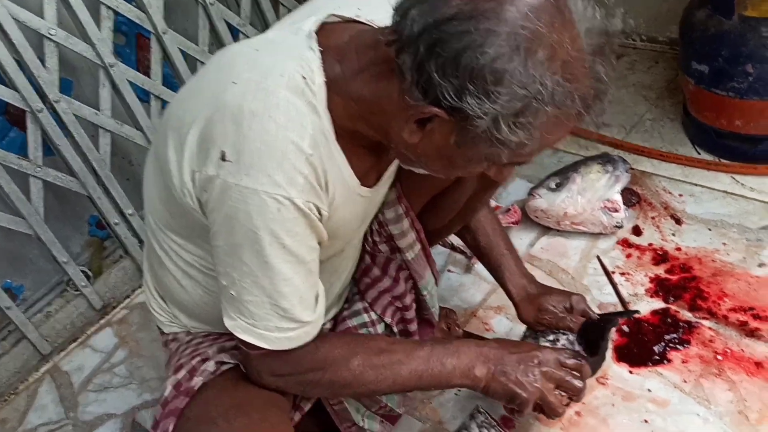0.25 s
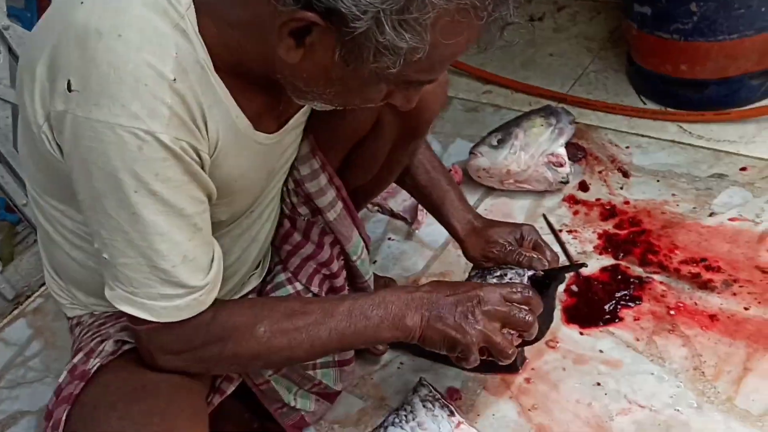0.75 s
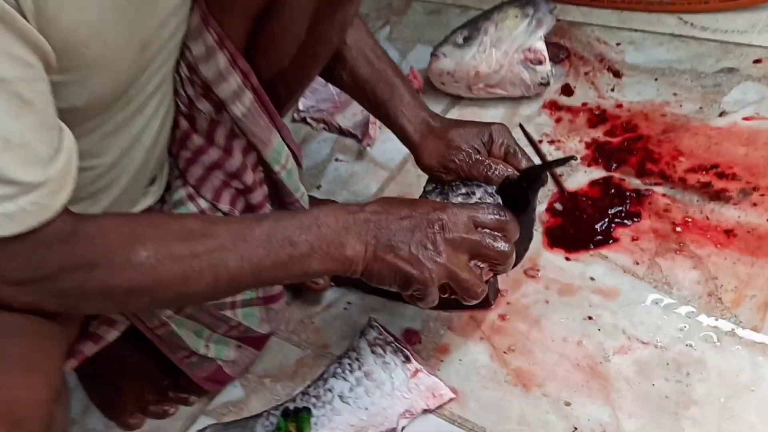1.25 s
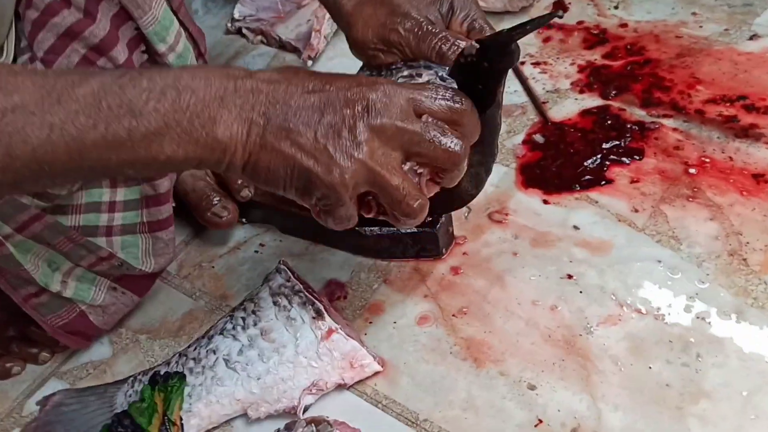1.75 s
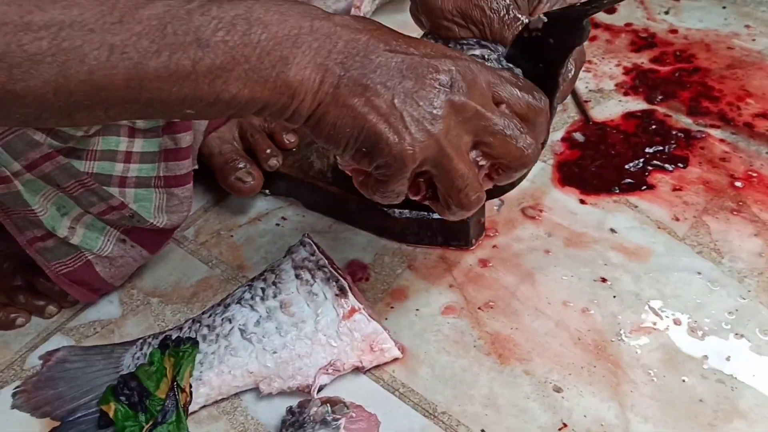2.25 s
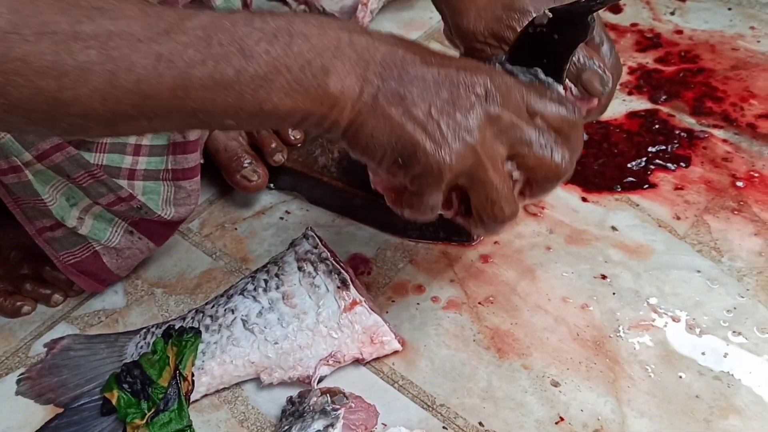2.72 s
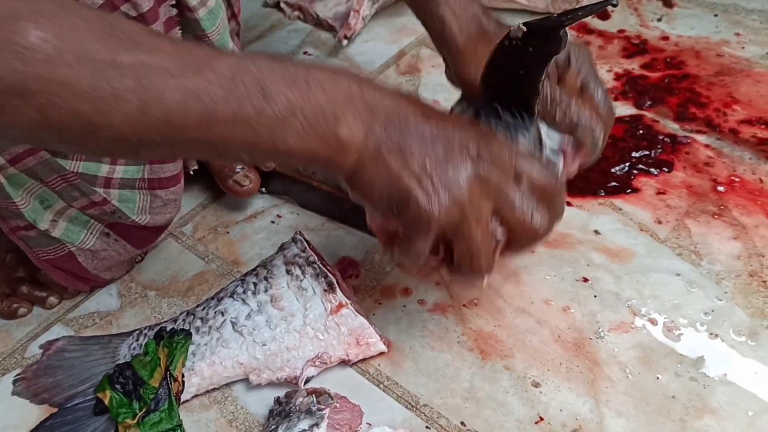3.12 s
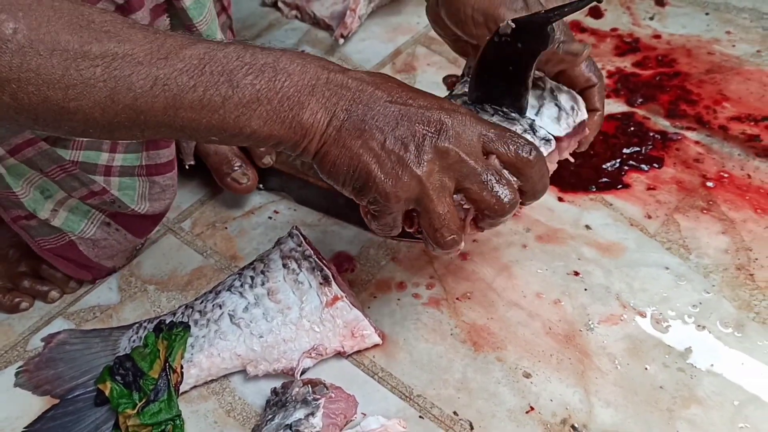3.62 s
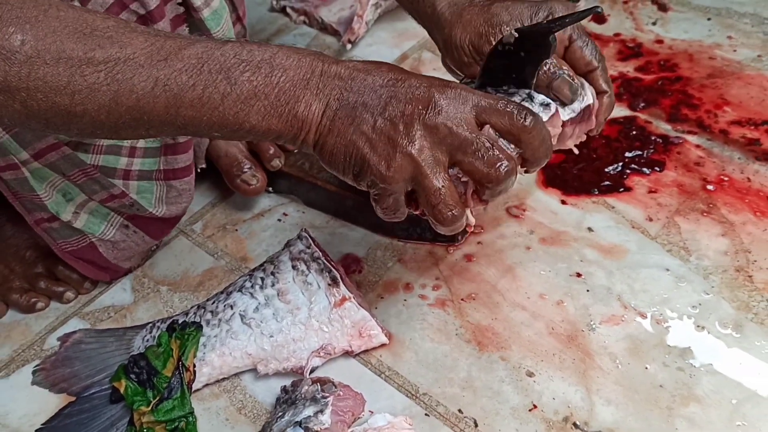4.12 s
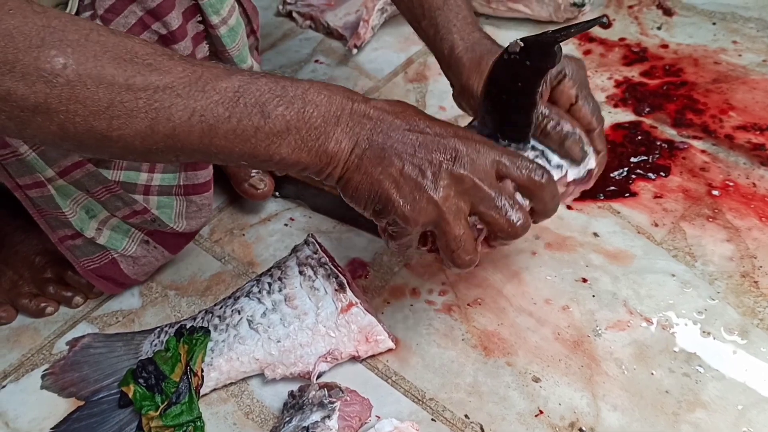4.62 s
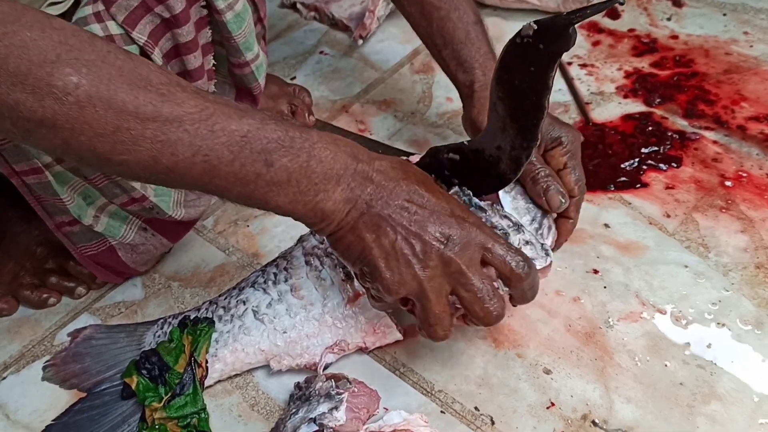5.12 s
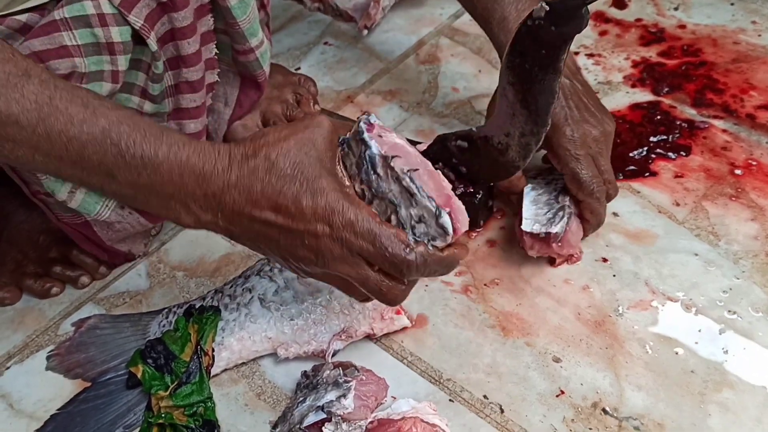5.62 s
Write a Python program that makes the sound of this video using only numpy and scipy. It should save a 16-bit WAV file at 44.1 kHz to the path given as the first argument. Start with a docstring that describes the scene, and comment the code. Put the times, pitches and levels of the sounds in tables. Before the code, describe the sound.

A large scaly fish is shoved through a fixed upright blade in crunching, snapping bursts over steady hiss in a small hard room.

```python
"""A large scaly fish is pushed in short shoves through an upright fixed blade, on a tiled floor.
Throughout: noise hiss and a growing low rumble in a small hard room, heard by two spaced microphones.
From 0.9 s: light scrapes, as random crackle. Near 2.4, 2.8, 4.4 and 4.9 s: hard shoves; scales crunch,
bones snap (noise bursts, damped rings), wet skin squeaks (gliding notes), the base knocks (damped modes).
From 5.1 s: ticks, a faint snap, low bumps (sagging sines) and a muffled rustle (filtered crackle)."""
import sys
import numpy as np
from scipy import signal
from scipy.fft import rfft, irfft
from scipy.io import wavfile
from scipy.ndimage import uniform_filter1d

SR = 44100
rng = np.random.default_rng(int(sys.argv[2]) if len(sys.argv) > 2 else 0)


def transcribe(u):
    """Save the signal u as a 16-bit wav file named by the first command-line argument.

    u: samples, shape (n,) or (channels, n), limited to [-1, 1]; the rate is SR.
    q: integer samples, one column per channel.
    """
    v = np.clip(np.atleast_2d(u).T, -1, 1)
    q = np.round(v * 32767).astype(np.int16)
    wavfile.write(sys.argv[1], SR, q)


N = 258426


def amp(db):
    """Decibels to gain."""
    return 10 ** (np.asarray(db) / 20)


def evened(x):
    """Scales to an rms of 1."""
    return x / np.sqrt(np.mean(x ** 2) + 1e-20)


def read(points, hz):
    """A table joined by straight lines over log frequency."""
    f, value = np.transpose(points)
    return np.interp(np.log(hz + 1), np.log(f + 1), value)


def curve(points):
    """A table joined by straight lines over time."""
    return np.interp(np.arange(N) / SR, *np.transpose(points))


def add(mix, s, sound):
    """Mixes a sound in at s seconds."""
    part = mix[..., max(round(s * SR), 0):][..., :sound.shape[-1]]
    part += sound[..., :part.shape[-1]]


def panned(x, side_table):
    """Splits a left-right level difference by pitch over a stereo spectrum."""
    hz = np.fft.rfftfreq(N, 1 / SR)
    return x * amp(np.outer([.5, -.5], read(side_table, hz)))


def colour(x, spectrum, size=2048):
    """Causal minimum-phase filter of unit energy: a click rings after it lands, never before."""
    hz = abs(np.fft.fftfreq(size, 1 / SR))
    log_gain = np.log(amp(read(spectrum, hz)))
    taps = np.fft.ifft(np.exp(np.conj(signal.hilbert(log_gain)))).real
    return signal.oaconvolve(x, taps[None] / np.linalg.norm(taps), axes=1)[:, :N]


def resonate(x, hz, width_hz):
    """A damped resonance of peak gain 1: shift down, smooth, shift back up."""
    turn = np.exp(2j * np.pi * np.cumsum(hz * np.ones(x.shape[-1])) / SR)
    r = np.exp(-np.pi * width_hz / SR)
    return 2 * (turn * signal.lfilter([1 - r], [1, -r], x / turn + 1e-18)).real


def uneven(t, spread_db, step_s):
    """A gain that wanders between random levels, a new one every step_s."""
    levels = rng.standard_normal(size=200)
    return evened(amp(spread_db * np.interp(t / step_s, np.arange(len(levels)), levels)))


def crackle(count, share, per_s=4500, spread_db=3):
    """Tiny fractures at random moments; a share of their power reaches both microphones alike."""
    size = amp(spread_db * np.minimum(rng.exponential(1, (3, count)), 4))
    sign = rng.choice([-1, 1], size.shape)
    both, left, right = evened(size * sign * (rng.random(size.shape) < per_s / SR))
    share = np.clip(share, 0, 1)
    return np.sqrt(share) * both + np.sqrt(1 - share) * np.array([left, right])


# hiss, left minus right: f/Hz, level/dB
HISS_SIDE = [(100, -0.5), (500, 1), (1400, -1), (2800, -1.3), (4000, 0), (5500, 0), (6700, 3), (8300, 1.5),
             (12000, -2), (16000, -1)]
MIC_SPACING_M = 0.18


def diffuse(spectrum):
    """Noise from all sides: the two microphones agree only at long wavelengths."""
    hz = np.fft.rfftfreq(N, 1 / SR)
    a, b = rfft(rng.standard_normal((2, N)))
    same = np.sinc(2 * hz * MIC_SPACING_M / 343) * .93  # 343 m/s: speed of sound
    pair = np.array([a, same * a + np.sqrt(1 - same ** 2) * b])
    return evened(irfft(panned(pair, HISS_SIDE) * amp(read(spectrum, hz)), N))


# spectra: f/Hz, level/dB
HISS = [(25, -23), (48, -22), (70, -4.5), (130, 2.5), (400, 5), (780, 3), (1100, 1.5), (1800, 2), (2500, 0),
        (3800, 1.5), (5400, 2), (7500, -3), (8450, -2.5), (9300, -52), (11000, -38), (11650, -9),
        (15500, -11)]
RUMBLE = [(25, -41), (48, -18), (72, -3.5), (92, -8.5), (138, 3.5), (200, -13), (350, -19), (800, -75)]
# courses: t/s, level/dB (hiss: before hiss_gain_db)
HISS_DB = [(0.0, -39), (1.5, -38.5), (3.0, -40), (5.86, -41)]
RUMBLE_DB = [(0, -58.5), (1.2, -55), (2.6, -53), (3.9, -51), (4.5, -43.5), (5.86, -45)]


def background(hiss_gain_db=4, waver_db=0.46, patchy_db=2.0, patchy_below_hz=900):
    """Steady hiss and a growing rumble; the level wavers slightly, the low end comes in uneven patches."""
    hiss = diffuse(HISS) * amp(curve(HISS_DB) + hiss_gain_db)
    rumble = diffuse(RUMBLE) * amp(curve(RUMBLE_DB))
    hz, _, z = signal.stft(hiss + rumble, SR, nperseg=2048, noverlap=1536)
    patches = uniform_filter1d(rng.standard_normal(z.shape[1:]), size=5, axis=0)
    patches = evened(uniform_filter1d(patches, size=7, axis=1))
    waver = evened(uniform_filter1d(rng.standard_normal(z.shape[2]), size=9))
    lowness = 1 / (1 + (hz[:, None] / patchy_below_hz) ** 2)
    z = z * amp(patchy_db * patches * lowness + waver_db * waver)
    return signal.istft(z, SR, nperseg=2048, noverlap=1536)[1][:, :N]


# decay of the tail: f/Hz, t60/s
ROOM_T60 = [(150, 0.091), (600, 0.22), (3000, 0.24), (8000, 0.24), (16000, 0.29)]


def room(x, tail_db=-7, near_db=-6, near_s=0.0043, count=2000):
    """Close echoes off floor and body, then the short tail of tiled walls."""
    size, step = SR // 2, SR // count
    taps = np.zeros((2, size))
    slots = np.arange(2 * step, size - step, step)
    at = slots + rng.integers(0, step, (2, len(slots)))  # one echo a slot
    np.put_along_axis(taps, at, rng.choice([-1., 1.], at.shape), 1)
    near = taps * rng.choice([-1, 1], taps.shape) * np.exp(-np.arange(size) / SR / near_s)
    hz, t, z = signal.stft(taps, SR, nperseg=256)
    decay = np.exp(-np.log(1000) * t / read(ROOM_T60, hz)[:, None])
    tail = signal.istft(z * decay, SR, nperseg=256)[1][:, :size]
    echoes = amp(tail_db) * tail / np.linalg.norm(tail[0]) + amp(near_db) * near / np.linalg.norm(near[0])
    return signal.fftconvolve(x, echoes, axes=1)[:, :N]


# wet fish drags as it is shifted: t/s, length/s, level/dB, centre f/Hz, width/Hz
RUBS = [(1.643, 0.057, -43, 337, 300), (2.236, 0.047, -48, 517, 400), (2.385, 0.14, -50.5, 280, 250),
        (3.721, 0.15, -49.5, 328, 130), (3.94, 0.065, -42.5, 400, 380), (5.496, 0.083, -42.5, 254, 417),
        (5.513, 0.055, -51, 1500, 350), (5.524, 0.059, -42.5, 340, 120), (5.57, .12, -53, 370, 450)]


def rubs(grains_per_s=900, rub_share=1.0):
    """Wet flesh drags over hand and floor: a muffled, grainy rustle that swells and fades."""
    out = np.zeros((2, N))
    for s, length_s, db, hz, width_hz in RUBS:
        grains = crackle(SR // 3, rub_share, grains_per_s)
        rustle = resonate(resonate(grains, hz, width_hz), hz, width_hz)
        rustle = rustle[:, -round(length_s * SR):]  # skips the build-up
        add(out, s, amp(db) * evened(rustle * signal.windows.tukey(rustle.shape[1], .8)))
    return out


# soft bumps of handled fish: t/s, level/dB, starting f/Hz
BUMPS = [(1.486, -38, 298), (2.247, -33, 375), (2.37, -28.5, 252), (3.16, -40.5, 255), (3.19, -40, 335),
         (4.832, -33, 258), (5.106, -38.5, 145), (5.517, -38, 204)]
BUMP_PERIODS, BUMP_SAG = 7.3, 0.21  # length in starting periods; share by which the pitch falls


def bumps():
    """Settling flesh gives a short low swell of sagging pitch and no click; the lower, the longer."""
    out = np.zeros(N)
    for s, db, hz in BUMPS:
        length_s = BUMP_PERIODS / hz
        t = np.arange(0, length_s, 1 / SR)
        turns = np.cumsum(hz * (1 - BUMP_SAG * t / length_s)) / SR
        swell = np.sin(np.pi * (t / length_s) ** 0.62)
        add(out, s, amp(db) * swell * np.sin(2 * np.pi * turns))
    return out


# the blade's base rocks on the floor: t/s, level/dB, favoured f/Hz
KNOCKS = [(2.376, -23, 597), (2.402, -25, 520), (2.74, -21, 635), (2.776, -17.5, 626), (3.193, -35, 484),
          (4.422, -31, 780), (4.441, -27, 780), (4.876, -22.5, 626)]
# modes of the base: f/Hz, level/dB, t60/s
BASE = [(485, 8, 0.062), (543, -9, 0.039), (619, -3, 0.072), (775, -12, 0.064)]


def knocks(attack_s=0.0018, favour_db_per_octave=36, detune_share=0.012):
    """The base rings briefly in damped modes; the spot on which it rocks favours some of them."""
    out, t = np.zeros(N), np.arange(SR // 3) / SR
    attack = 1 - np.exp(-t / attack_s)
    for s, db, favoured_hz in KNOCKS:
        for hz, level_db, t60_s in BASE:
            mode_hz = hz * (1 + detune_share * rng.standard_normal())
            mode = np.exp(-np.log(1000) * t / t60_s) * np.sin(2 * np.pi * mode_hz * t)
            loss_db = favour_db_per_octave * abs(np.log2(hz / favoured_hz))
            add(out, s, amp(db + level_db - loss_db) * mode * attack)
    return out


# wet skin along the steel: t/s, length/s, first f/Hz, last f/Hz, width/Hz, level/dB
SQUEAKS = [(2.53, 0.055, 2060, 2080, 300, -36), (4.428, 0.087, 1780, 1695, 140, -45),
           (4.462, 0.041, 468, 573, 40, -42), (4.884, 0.022, 2270, 2140, 260, -36),
           (4.885, 0.083, 752, 584, 75, -33.5), (4.947, 0.042, 632, 583, 110, -39)]


def squeaks(overtone_db=-19, rough_db=4, rough_s=0.00336):
    """Stick and slip gives a short gliding note that stutters, with weak overtones."""
    out = np.zeros(N)
    for s, length_s, first_hz, last_hz, width_hz, db in SQUEAKS:
        hz = np.linspace(first_hz, last_hz, round(length_s * SR))
        smooth = [1, -np.exp(-np.pi * width_hz / SR)]
        drift = evened(signal.lfilter([1], smooth, rng.standard_normal(SR // 4)))[:len(hz)]
        phase = 2 * np.pi * np.cumsum(hz + width_hz * drift / 2) / SR
        note = np.sin(phase) + amp(overtone_db) * (np.sin(2 * phase) + np.sin(3 * phase))
        stutter = uneven(np.arange(len(hz)) / SR, rough_db, rough_s)
        add(out, s, amp(db) * note * stutter * signal.windows.tukey(len(hz), .9))
    return out


# single scales off the edge: t/s, level/dB
FLICKS = [(.898, -39), (1.3429, -41), (1.7131, -34), (1.8857, -32.5), (2.4524, -41), (3.1748, -32),
          (3.3374, -39), (3.5659, -54), (4.1376, -40), (5.261, -42), (5.4107, -37)]


def flicks(decay_s=0.00038):
    """A scale lets go with one dry tick of decaying noise."""
    out, t = np.zeros((2, N)), np.arange(SR // 200) / SR
    for s, db in FLICKS:
        add(out, s, amp(db) * evened(rng.standard_normal((2, len(t))) * np.exp(-t / decay_s)))
    return out


# shoves and scrapes: t of most force/s, length/s, crisp scale level/dB, dull flesh level/dB,
# rasp f/Hz, f of the cut's hollow/Hz
SHOVES = [(0.939, 0.21, -44.5, -48.5, 7300, 800), (1.353, 0.071, -40.5, -54, 7100, 650),
          (1.494, 0.09, -41, -39.5, 4500, 616), (1.72, 0.076, -38, -46, 8400, 450),
          (1.931, .1, -37.5, -43, 7360, 600), (2.342, 0.031, -32, -43, 7000, 900),
          (2.374, 0.11, -35.5, -32, 4400, 1160), (2.777, .08, -33.5, -37, 7000, 480),
          (2.821, 0.068, -31.5, -35.5, 7380, 1050), (3.185, 0.097, -39.5, -42, 7100, 696),
          (4.12, 0.109, -51, -44, 3500, 516), (4.42, 0.06, -26, -38, 6400, 744),
          (4.441, 0.048, -28.5, -34.5, 4370, 760), (4.473, 0.076, -45, -45, 3200, 1200),
          (4.849, 0.043, -26, -32, 7440, 560), (4.869, 0.048, -25, -36.5, 4060, 694),
          (4.917, 0.067, -42, -40.5, 3800, 1110)]
RISE_SHARE, FORCE_POWER = .47, 0.99  # force builds over this share of a shove, then lets go


def shoves(scale_share=0.07, flesh_share=0.63, rasp_width_hz=1100, rasp_db=-3,
           hollow_width_hz=350, hollow_db=-9, idle_db=-56, catch_db=3, catch_s=0.0014):
    """The edge crackles through scales and flesh as force swells, catching unevenly; faint crackle idles."""
    crisp, dull = amp(idle_db) * crackle(N, 0), np.zeros((2, N))
    for s, length_s, crisp_db, dull_db, rasp_hz, hollow_hz in SHOVES:
        t, rise_s = np.arange(0, length_s, 1 / SR), RISE_SHARE * length_s
        force = np.interp(t, [0, rise_s, length_s], [0, 1, 0]) ** FORCE_POWER
        force = force * uneven(t, catch_db, catch_s)
        scales = crackle(SR // 3, scale_share)[:, :len(t)]
        flesh = crackle(SR // 3, flesh_share)[:, :len(t)]
        rasp = evened(resonate(scales, rasp_hz, rasp_width_hz))
        hollow = evened(resonate(flesh, hollow_hz, hollow_width_hz))
        add(crisp, s - rise_s, amp(crisp_db) * force * evened(scales + amp(rasp_db) * rasp))
        add(dull, s - rise_s, amp(dull_db) * force * evened(flesh + amp(hollow_db) * hollow))
    return crisp, dull


# snaps of bone: t/s, crack level/dB, thump in the flesh level/dB, ring of the piece level/dB,
# its main f/Hz, its second f/Hz, pop of the cut's hollow level/dB, hollow f/Hz
SNAPS = [(1.4814, -34, -39, -35, 4380, 6960, -51, 1080), (1.9354, -38, -51, -36, 4370, 6900, -48, 1210),
         (2.3514, -32, -42, -35, 4300, 8300, -44, 920), (2.3572, -32, -42, -38, 3400, 1860, -37, 910),
         (2.3602, -24.5, -34, -31, 8500, 6800, -44, 1700), (2.369, -37, -30, -31, 6600, 7200, -36, 545),
         (2.3745, -26, -37, -25, 6250, 7000, -39, 900), (2.377, -29, -33, -45, 7450, 2020, -35, 1300),
         (2.388, -21.5, -44, -30, 4700, 6300, -29.5, 620), (2.3898, -44, -45, -36, 8300, 3730, -49, 1910),
         (2.7384, -36, -49, -38.5, 4690, 6600, -55, 620), (2.7744, -36, -45, -34, 8500, 4670, -43, 2020),
         (2.8025, -23, -29.5, -22, 6770, 4470, -38, 1070), (2.8062, -32, -52, -32, 6900, 7700, -42, 1060),
         (2.8224, -31, -47, -33, 6450, 7700, -38, 1430), (2.8442, -33, -49, -50, 4200, 7700, -54, 1090),
         (4.4192, -25.5, -40, -24, 5870, 6800, -39, 766), (4.4222, -30, -44, -38, 4150, 2900, -55, 700),
         (4.4278, -37, -45, -29, 6900, 8200, -48, 1700), (4.4364, -36, -32.5, -26, 4600, 3500, -38, 1800),
         (4.8403, -30, -42, -25, 4340, 6800, -34, 930), (4.8432, -33, -46, -35, 7060, 4060, -43, 450),
         (4.8695, -28, -60, -23.5, 4150, 7370, -44, 1900), (4.8746, -40, -53, -30, 6600, 3740, -42, 620),
         (5.2378, -57, -62, -40, 3620, 6560, -66, 700)]


def snaps(splinter_s=0.00044, yield_s=0.0024, ring_s=0.001, second_db=-3, break_share=0.081,
          break_hz=5800, push_hz=3200, lag_s=.00005, tear_db=-15, tear_s=0.012, tear_share=2.5, pop_s=0.0028):
    """A piece yields, breaks, splinters and tears on; it rings in two short modes and the hollow pops."""
    crisp, dull, rings = np.zeros((3, 2, N))
    t = np.arange(-SR // 400, SR // 80) / SR  # 0 at the break
    push = evened(np.exp(-(np.pi * push_hz * t) ** 2))  # wet flesh rounds the first pulse
    first_break = evened(t * np.exp(-(np.pi * break_hz * t) ** 2))  # bone flicks out and back
    burst = np.exp(-abs(t) / np.where(t < 0, yield_s, splinter_s))
    burst = burst + amp(tear_db) * (t > 0) * np.exp(-abs(t) / tear_s)
    since = np.maximum(t - np.array([[0], [lag_s]]), 0)  # ring and pop reach the left microphone first
    for s, crack_db, thump_db, ring_db, piece_hz, second_hz, pop_db, hollow_hz in SNAPS:
        splinters = evened(rng.standard_normal((2, len(t))) * burst)
        modes = np.sin(2 * np.pi * piece_hz * since) + amp(second_db) * np.sin(2 * np.pi * second_hz * since)
        ring = evened(modes * np.exp(-since / ring_s))
        pop = evened(np.sin(2 * np.pi * hollow_hz * since) * np.exp(-since / pop_s))
        add(crisp, s + t[0], amp(crack_db) * evened(splinters + break_share * first_break))
        add(dull, s + t[0], amp(thump_db) * evened(push + tear_share * splinters))
        add(rings, s + t[0], amp(ring_db) * ring + amp(pop_db) * pop)
    return crisp, dull, rings


# spectra of scale and flesh: f/Hz, level/dB
CRISP = [(300, -84), (1500, 10), (2600, -2.5), (3400, 8), (4300, 3.5), (5400, 13.5), (6600, 3.5), (7600, 2),
         (8400, 7.5), (9200, -9.5), (12000, 6), (15500, 0.5)]
FLESH = [(30, -35), (60, -10), (180, 1), (550, 11.5), (800, 13), (1400, 8.5), (1750, 12), (2300, 5.5),
         (4000, 13.5), (9000, -38)]
# modes of the steel: f/Hz, width/Hz, level/dB
BLADE = [(1050, 30, -26), (1250, 27, -20), (1800, 21, -11), (4280, 17, -27), (4840, 37, 5.5),
         (6230, 45, -6), (8050, 55, -14)]


def cutting():
    """Crackles, flicks and snaps sound through the fish and stir the damped modes of the steel."""
    scales, flesh = shoves()
    cracks, thumps, rings = snaps()
    cut = colour(scales + cracks + flicks(), CRISP) + colour(flesh + thumps, FLESH) + rings
    steel = sum(amp(db) * resonate(cut, hz, width_hz) for hz, width_hz, db in BLADE)
    return cut + steel


# work and its echoes, left minus right: f/Hz, level/dB
CUT_SIDE = [(200, -5), (550, 4.5), (1100, 0), (1900, -4), (3000, 2.5), (4200, -1), (5600, 0), (7500, 2.5),
            (13000, -1.5)]


def scene():
    """The work in its room, louder left or right by pitch, over bumps, rubs and background."""
    work = cutting() + knocks() + squeaks()
    placed = irfft(panned(rfft(work + room(work)), CUT_SIDE), N)
    return placed + bumps() + rubs() + background()


# microphone colour: f/Hz, level/dB
MIC = [(4600, -1.5), (4850, -8), (6000, -7.5), (6250, 0), (7650, 2.5), (7850, -2), (8400, 0), (8900, 5.5),
       (11650, -9.5)]
# narrow gap in the treble, lift above it: f/Hz, level/dB
TREBLE_GAP = [(8500, 0), (9350, -2), (9800, -17), (11200, -38), (11650, 9)]
EDGE_HZ = 15600


def record(dry):
    """Microphone colour, a gap in the treble, then a linear-phase band limit."""
    hz = np.fft.rfftfreq(N, 1 / SR)
    heard = irfft(rfft(dry) * amp(read(MIC, hz) + read(TREBLE_GAP, hz)), N)
    band_limit = signal.firwin(511, EDGE_HZ, window=("kaiser", 9), fs=SR)
    return signal.oaconvolve(heard, band_limit[None], "same")


dry = scene()
out = record(dry)
transcribe(out)
```